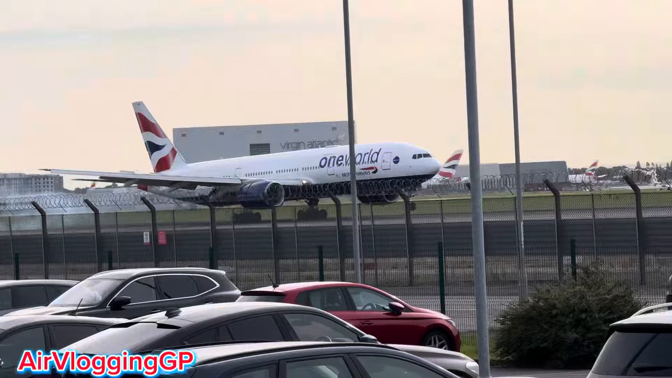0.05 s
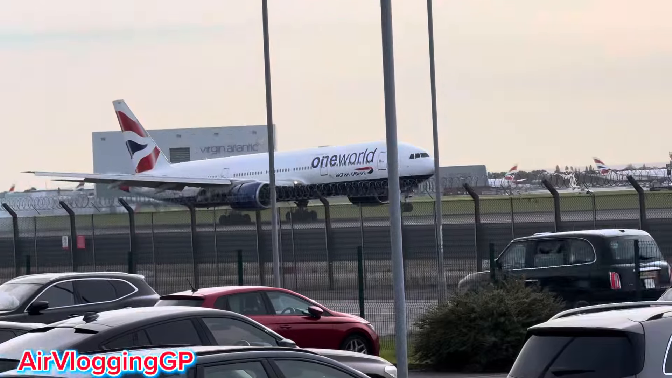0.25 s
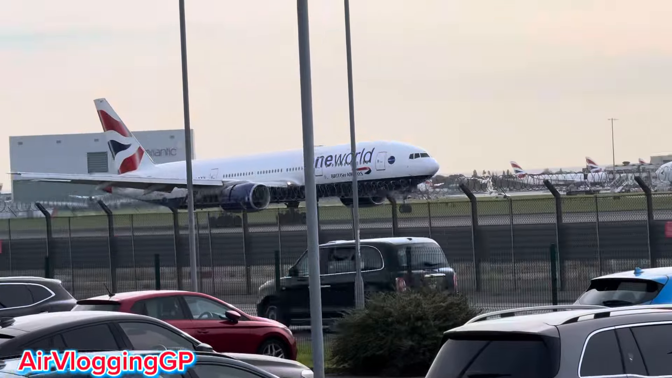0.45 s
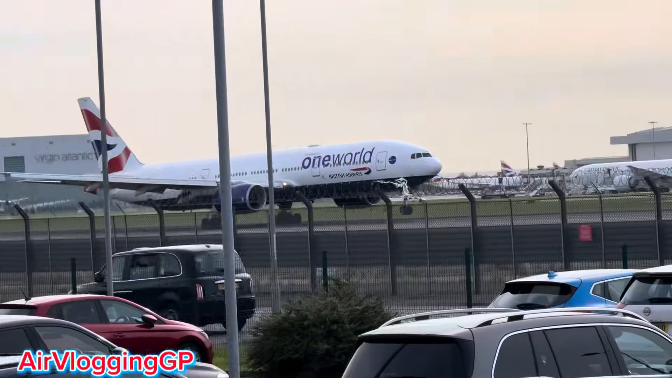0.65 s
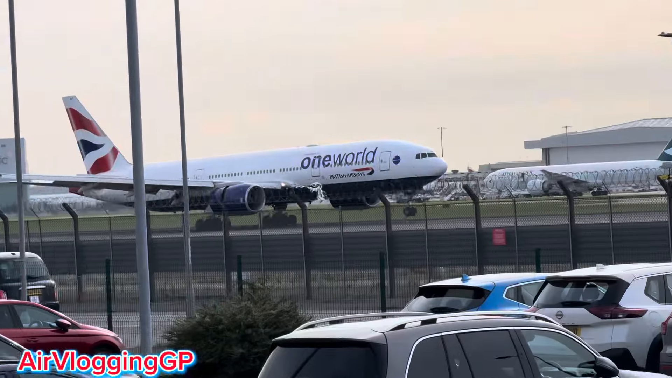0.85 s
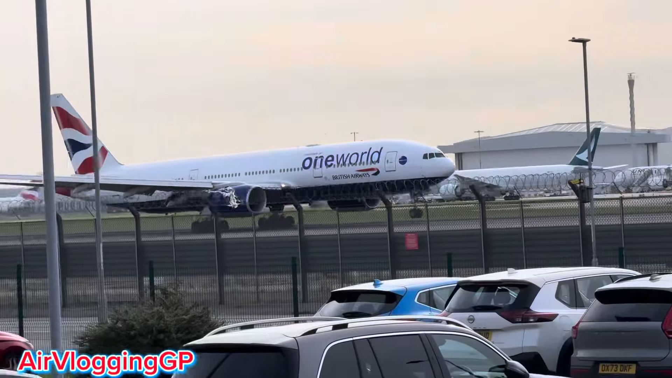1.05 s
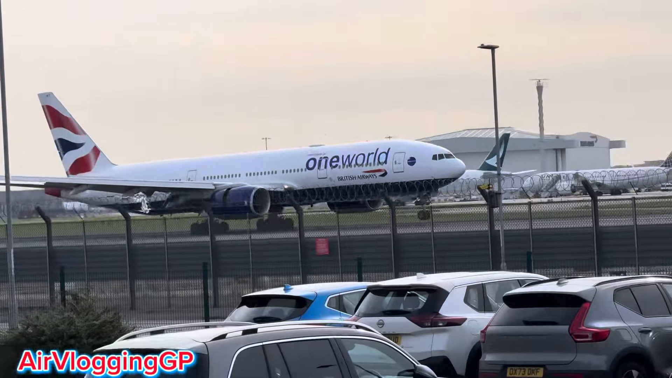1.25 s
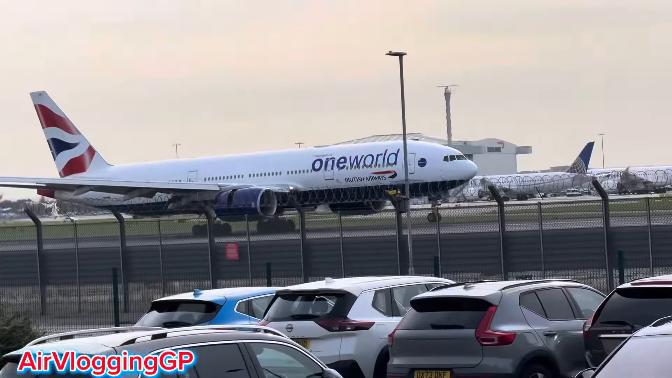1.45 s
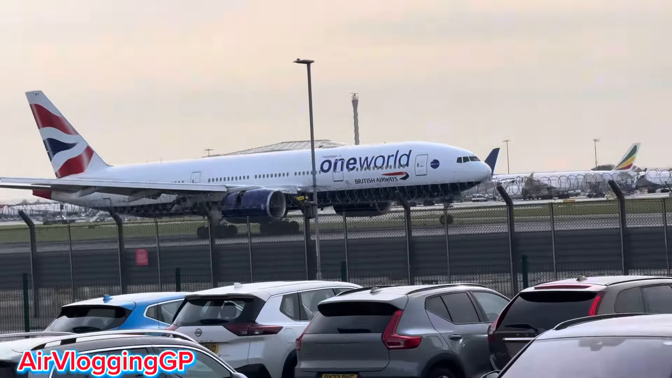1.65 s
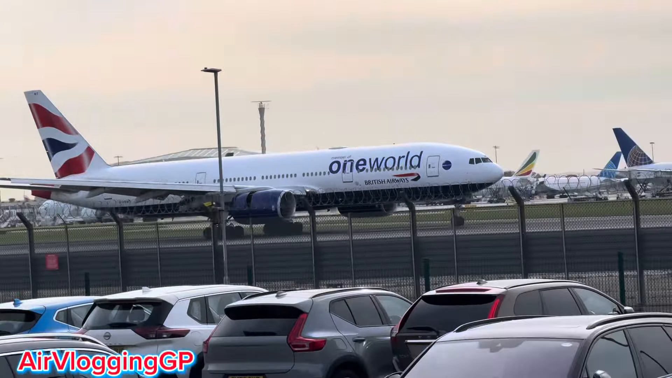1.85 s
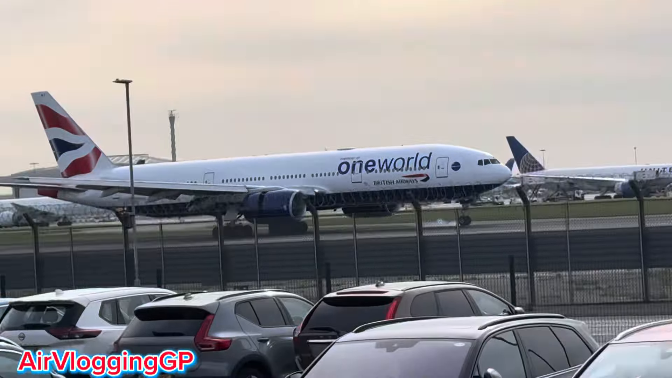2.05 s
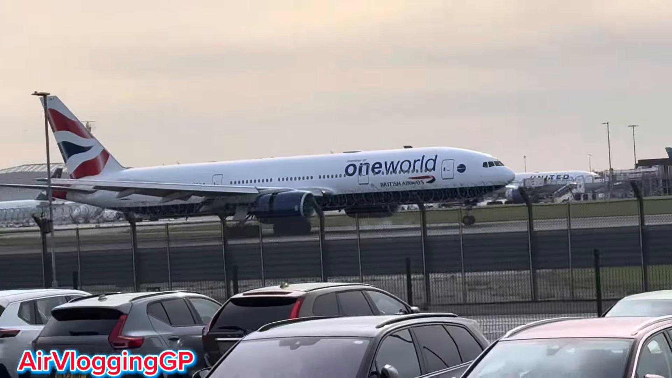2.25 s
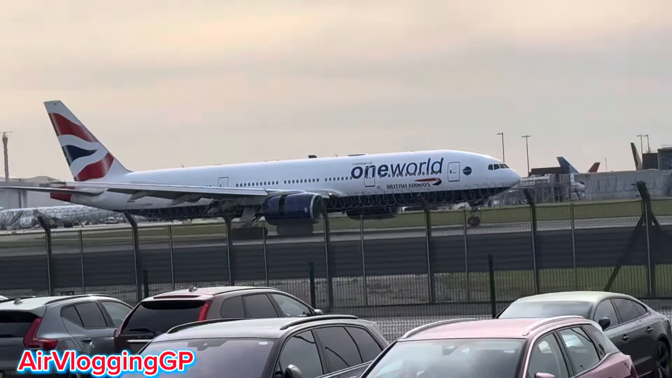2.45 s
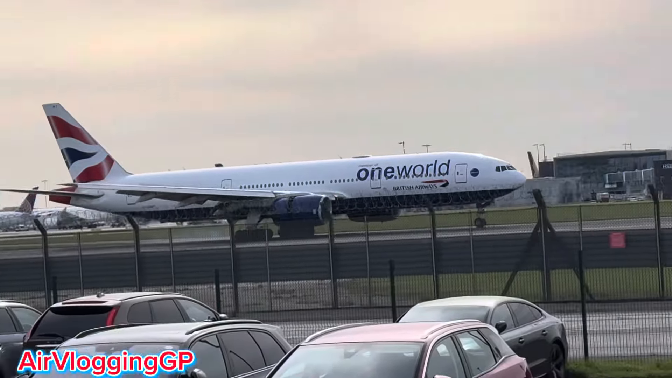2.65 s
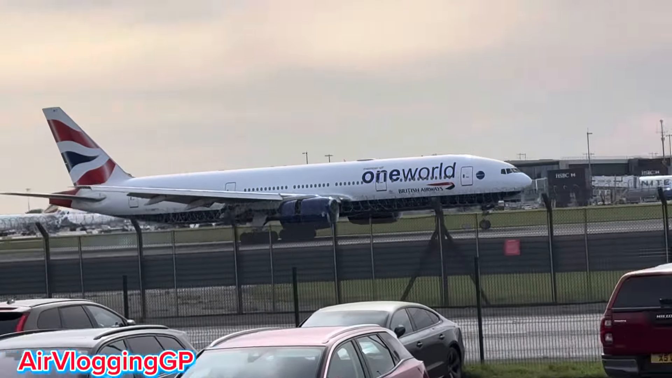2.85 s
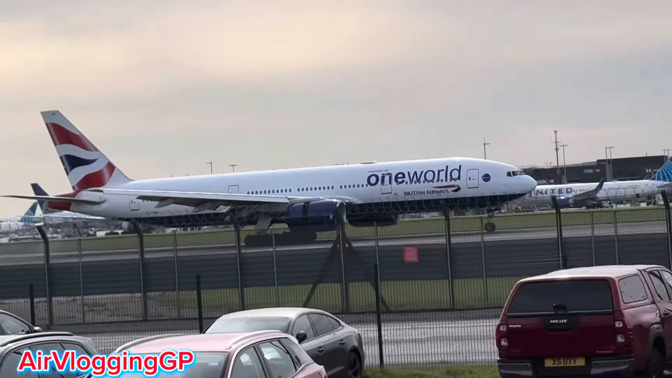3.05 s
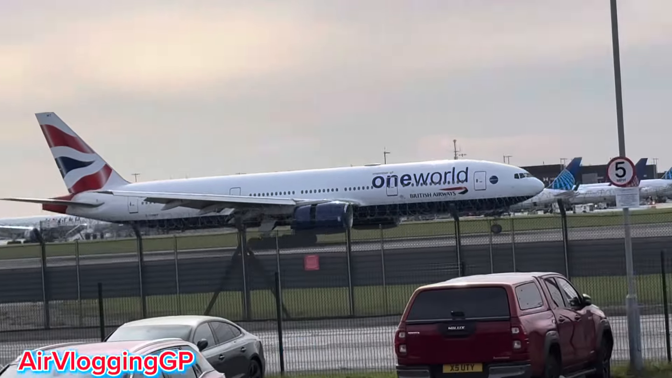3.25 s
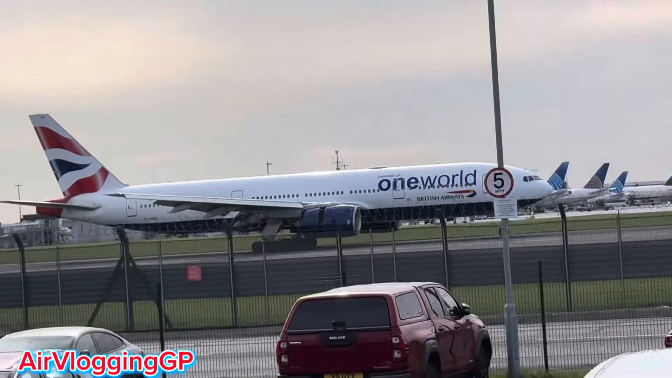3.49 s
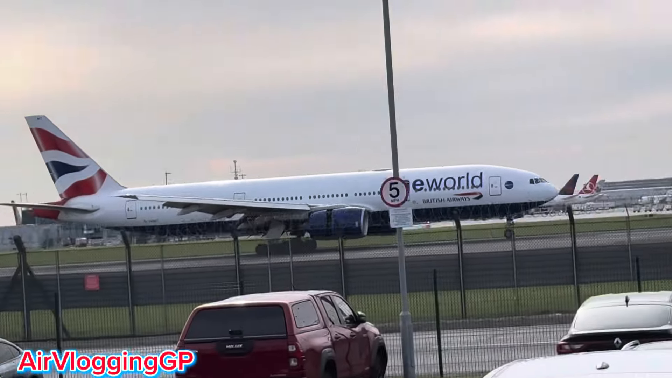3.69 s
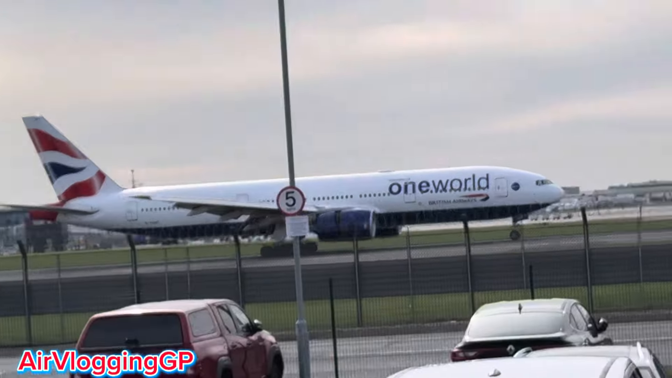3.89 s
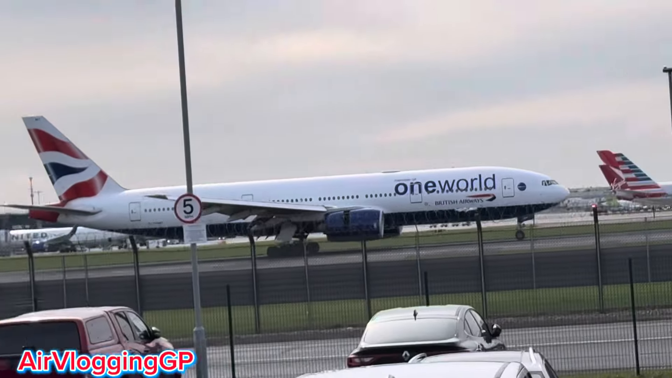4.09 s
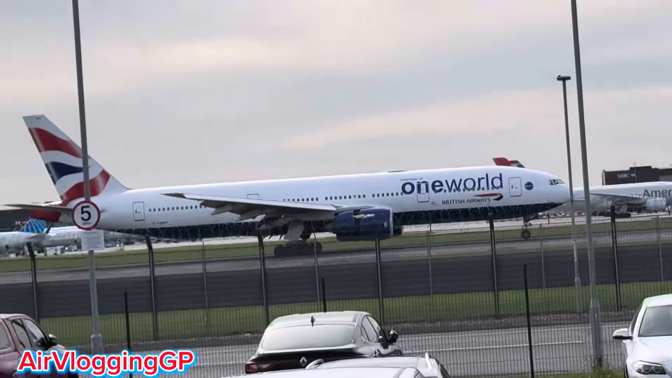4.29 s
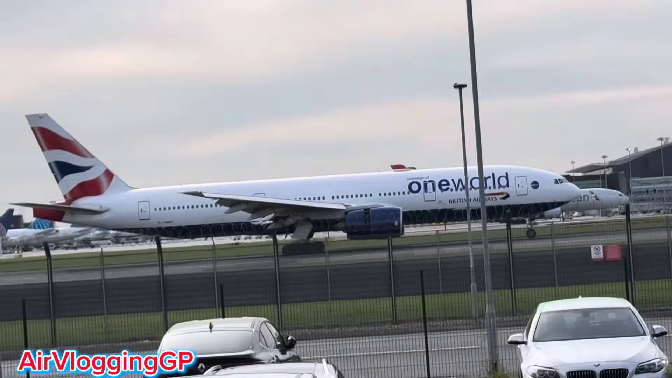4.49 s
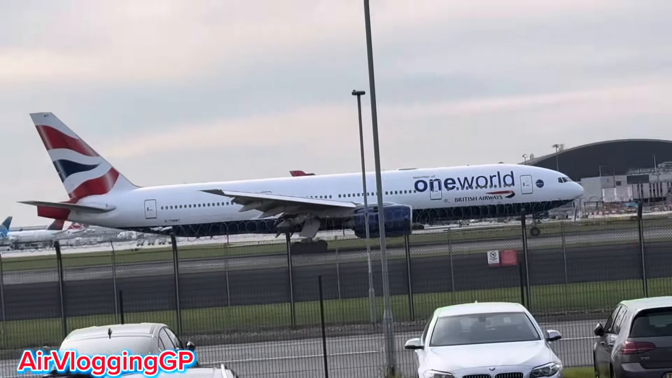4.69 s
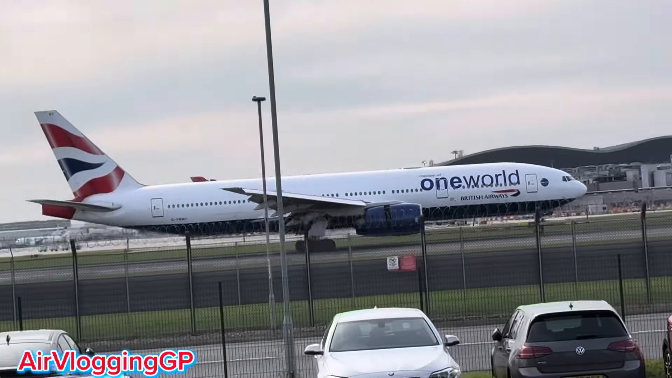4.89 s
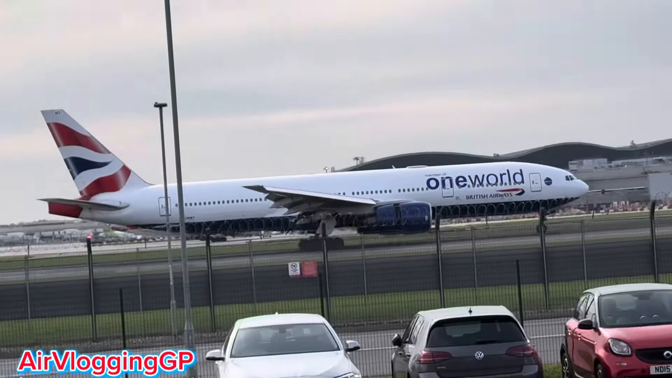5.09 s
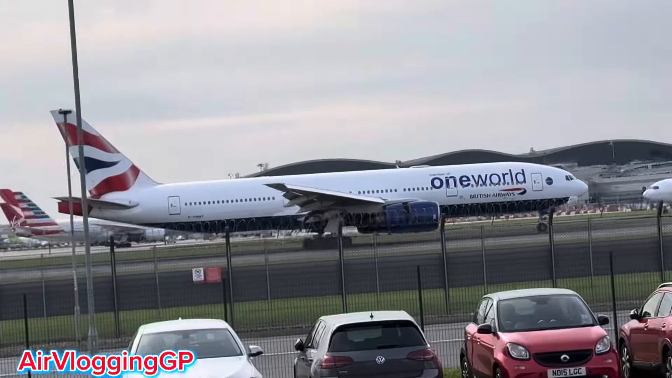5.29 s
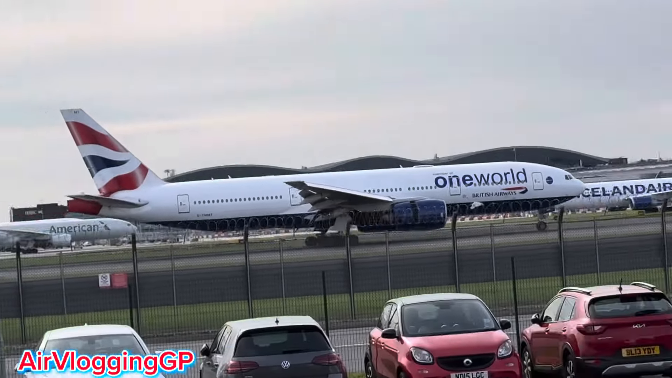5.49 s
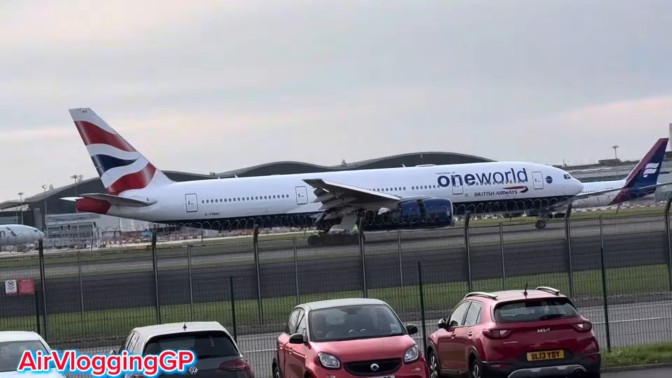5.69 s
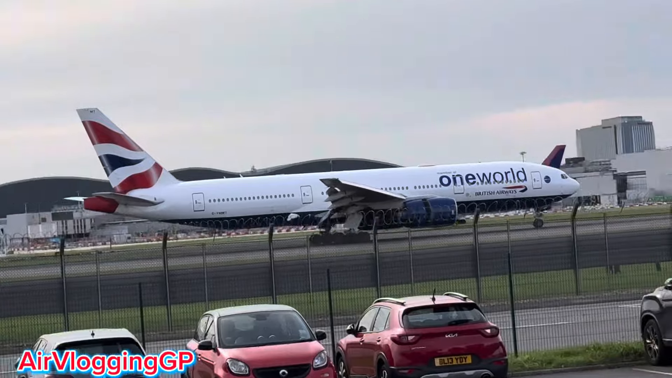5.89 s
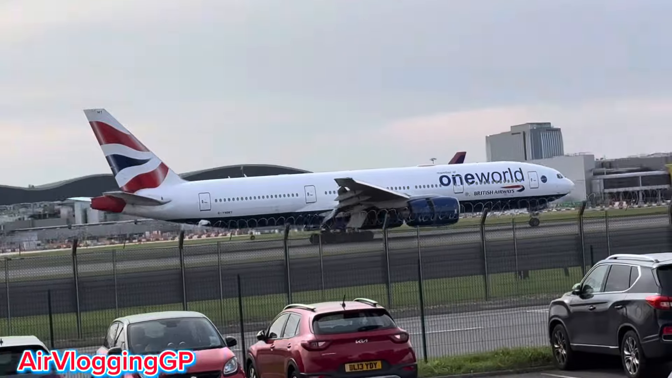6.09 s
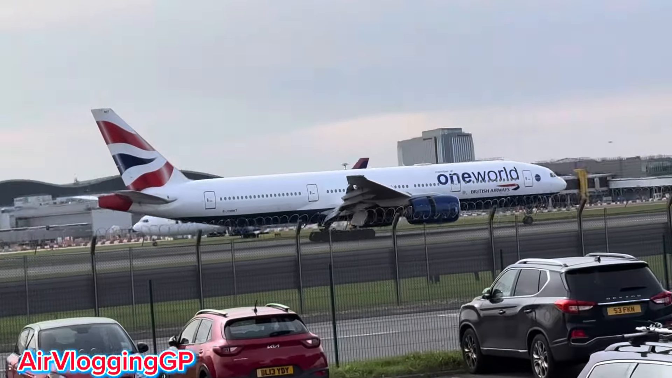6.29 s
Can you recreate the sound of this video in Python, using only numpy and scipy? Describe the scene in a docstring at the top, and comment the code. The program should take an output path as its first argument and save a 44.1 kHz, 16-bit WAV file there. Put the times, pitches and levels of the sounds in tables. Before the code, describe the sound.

Heard from a car park beyond the fence, a big airliner rolls out after landing. Deep bass rumble dominates at first, with a faint wavering howl sinking slightly in pitch and a thin whine. Around two seconds brief gliding tones poke out as fan rush rises. The reverse-thrust roar peaks past the middle, then eases but stays bright and patchy. Handheld phone, stereo, light wind buffeting.

```python
"""A large jet airliner rolls out along a runway, heard on a phone from a car park beyond the fence.
Coloured noises on drawn levels make exhaust rumble, reverse-thrust roar and fan rush; the air dulls the
treble and turbulence makes it patchy. Wavering tones make a sinking howl and a fan whine, and short
gliding bands stand out of the rush. A faint treble rustle is near, and a breeze buffets the two ports."""
import sys
import numpy as np
from scipy import signal
from scipy.fft import rfft, irfft
from scipy.io import wavfile
from scipy.ndimage import uniform_filter1d

SR = 44100
rng = np.random.default_rng(int(sys.argv[2]) if len(sys.argv) > 2 else 0)


def invert_db(level):
    """Linear amplitude ratio for a level in decibels (20 dB per decade), elementwise."""
    return 10 ** (np.asarray(level, dtype=float) / 20)


def output_pcm(signal):
    """Save a mono or channel-first signal as 16-bit PCM at the path in sys.argv[1].

    Samples are clipped to [-1, 1] before scaling.
    """
    pcm = np.clip(np.atleast_2d(signal).T, -1, 1) * 32767
    wavfile.write(sys.argv[1], SR, np.round(pcm).astype(np.int16))


N = 279583
T = np.arange(N) / SR  # seconds
F = np.maximum(np.fft.rfftfreq(N, 1 / SR), 1)  # Hz

# Swells of the exhaust rumble: start_s, level_db
RUMBLE_LEVEL = [(0, -26), (.3, -27.5), (.65, -23.5), (1, -25), (1.55, -19), (1.74, -25), (2.1, -15),
                (2.5, -18), (2.9, -13.5), (3.2, -17), (3.42, -9.5), (3.67, -16), (3.9, -12), (4.6, -13.5),
                (5.1, -15), (5.7, -16.5), (6.34, -17)]
# Swells of the growl above the rumble: start_s, level_db
GROWL_LEVEL = [(0, -45.5), (.6, -40), (1.1, -37), (1.6, -34.5), (2.1, -31), (2.6, -25.5), (3.0, -24),
               (3.5, -21.5), (3.9, -23.5), (4.3, -26), (4.7, -25.5), (5.1, -33.5), (5.6, -25), (6.0, -27.5),
               (6.34, -29.5)]
# Swells of the reversed flow: start_s, level_db
ROAR_LEVEL = [(0, -38), (.75, -38), (1.25, -38.5), (1.8, -34.5), (1.97, -31.5), (2.15, -32.5), (2.6, -32),
              (3.3, -26), (3.45, -25), (3.6, -21.5), (3.8, -21.5), (4.0, -24), (4.3, -25), (4.6, -28.5),
              (5.15, -28.5), (5.5, -32.5), (5.75, -28.5), (6.34, -31)]
# Swells of the fan rush: start_s, level_db
FAN_LEVEL = [(0, -42), (.95, -41), (1.5, -40.5), (1.69, -38), (1.75, -34.5), (1.86, -34.5), (2.05, -33),
             (2.33, -37), (2.75, -33), (2.95, -35), (3.1, -31.5), (3.26, -28), (3.36, -26), (3.5, -28),
             (3.75, -28), (3.9, -27), (4.15, -30), (4.35, -28.5), (4.7, -29.5), (5.1, -29.5), (5.25, -31),
             (5.45, -33), (5.64, -32), (5.76, -28), (5.88, -30.5), (6.05, -30.5), (6.34, -33)]
# Airframe howl: start_s, pitch_hz, level_db
HOWL = [(0, 570, -46), (.25, 566, -46), (.42, 562, -42), (.48, 565, -52), (.54, 568, -38),
        (.61, 564, -34.5), (.68, 554, -43), (.9, 540, -41), (1.06, 530, -40), (1.17, 520, -38.5),
        (1.22, 524, -43), (1.27, 532, -36.5), (1.33, 522, -48), (1.38, 526, -41), (1.45, 535, -47),
        (1.54, 542, -38.5), (1.7, 526, -42), (1.84, 520, -42), (1.9, 514, -36), (1.95, 511, -29.5),
        (2.02, 518, -39), (2.1, 525, -46), (2.16, 538, -34), (2.23, 530, -47), (2.29, 540, -34.5),
        (2.35, 530, -50), (2.8, 520, -54)]
# Fainter tone above the howl: start_s, pitch_hz, level_db
OVERTONE = [(1.8, 850, -62), (1.92, 852, -43), (2.05, 838, -46), (2.17, 846, -43), (2.3, 830, -44.5),
            (2.4, 812, -44), (2.5, 800, -62), (2.7, 800, -90)]
# Fan blade whine: start_s, pitch_hz, level_db
WHINE = [(0, 3300, -68), (.6, 3260, -61), (.72, 3255, -56), (.78, 3250, -60), (.84, 3250, -52),
         (.92, 3250, -59), (1.18, 3250, -54), (1.25, 3245, -56), (1.32, 3235, -46), (1.4, 3170, -57),
         (1.55, 3110, -50), (1.65, 3120, -55), (1.8, 3180, -57), (2.0, 3210, -48), (2.1, 3170, -54),
         (2.18, 3130, -45), (2.24, 3110, -58), (2.5, 3050, -70)]
# Brief narrow gliding bands, one early and a cluster near two seconds:
# middle_s, half_length_s, pitch_hz, glide_hz_per_s, width_hz, level_db
STREAKS = [(.82, .045, 815, 300, 300, -38), (1.82, .04, 1750, 2500, 200, -42),
           (1.88, .05, 2180, 4000, 260, -41), (1.89, .03, 1800, 600, 120, -43),
           (1.94, .035, 1420, 2200, 150, -41), (2.0, .025, 1640, 3500, 150, -37.5),
           (2.025, .025, 1860, 600, 100, -37), (2.09, .04, 1860, 1200, 160, -43),
           (2.11, .05, 2420, 2500, 260, -43), (1.96, .04, 775, 500, 90, -39),
           (2.08, .04, 745, 200, 70, -40), (1.9, .08, 472, -120, 40, -37)]
# The path as the jet goes by: start_s, treble_gain_db (at 7 kHz), duct_over_rush_db, roar_upper_over_lower_db
PATH = [(0, -13.5, -9, -3), (1, -18, -9, 1), (1.7, -10, -8, 3.5), (2.5, -5.5, -7, -1), (3.4, -6, -8, -3.5),
        (3.62, -6.5, -6, 4.5), (3.85, -6.5, -9.5, -6.5), (4.2, -4.5, -9.5, -3.5), (4.45, -4.5, -7.5, -5.5),
        (4.9, -3.5, -6.5, -1), (5.15, -6, -8.5, 1), (5.5, -3.5, -6, 7.5), (5.8, -3, -8, 4.5),
        (6.34, -5.5, -14, 5)]
# Moments when the treble brightens: middle_s, half_length_s, gain_db (at 7 kHz)
FLARES = [(3.32, 0.044, 1.5), (3.796, 0.015, 4.5), (3.982, 0.0095, 4), (4.106, 0.022, 6), (4.323, 0.038, 1),
          (5.107, 0.01, 4), (5.333, 0.016, 3), (5.75, 0.077, 0.5)]
# Band around 3.5 kHz against the rest of roar and fans: start_s, gain_db
PRESENCE = [(0, -3.5), (.9, 0), (1.3, 2), (1.65, 3), (1.76, 1), (2.3, 2.5), (2.6, 1), (3.0, 2), (3.45, 2),
            (3.9, -1.5), (4.5, -1), (5.1, -1), (5.6, -0.5), (6.34, -2.5)]
PRESENCE_HZ, PRESENCE_OCTAVES = 3520, .45
# Faint near rustle: middle_s, half_length_s, level_db
RUSTLE = [(.25, 0.13, -82), (0.498, 0.11, -73.5), (.64, 0.063, -79), (0.74, 0.056, -74), (2.38, .0015, -67),
          (2.401, .0018, -57)]
# Gusts on the ports: start_s, end_s, level_db
GUSTS = [(1.162, 1.74, -37), (4.53, 4.66, -31), (5.048, 5.3, -42.5), (5.7, 6.0, -45.5)]
GUST_EDGE_S, CALM_DB = .03, -56

# Noise colours, only their shape counts: pitch_hz, density_db (per Hz)
RUMBLE_COLOUR = [(15, -53.5), (25, -22.5), (40, -6), (52, 3), (72, 2.5), (100, -2), (130, -8.5), (180, -21),
                 (300, -87.5), (600, -120)]
GROWL_COLOUR = [(30, -70), (60, -38), (100, -6), (150, 7), (190, 3), (250, -8.5), (330, -19), (500, -66),
                (1200, -120)]
ROAR_COLOUR = [(50, -82.5), (120, -38), (220, -2), (300, -2.5), (450, -5.5), (700, -6), (900, -9.5),
               (1200, -20.5), (2000, -48), (5000, -120)]
RUSH_COLOUR = [(150, -84.5), (400, -37), (800, -10.5), (1100, -0.5), (1500, -2.5), (2000, -4.5), (2600, -7),
               (3400, -8.5), (4400, -15), (4850, -19.5), (5400, -17.5), (5800, -19.5), (7000, -26),
               (7800, -29), (8700, -40.5), (9300, -41), (11000, -53.5), (12500, -77.5)]
DUCT_COLOUR = [(700, -92), (1500, -42.5), (2100, -9), (2400, -5.5), (2700, -6.5), (2900, -10.5),
               (4000, -51), (8000, -110)]
BUFFET_COLOUR = [(25, -31.5), (60, 1), (110, -1.5), (200, -8.5), (350, -24.5), (1500, -90)]
HISS_COLOUR = [(1500, -77), (3000, -30), (6000, 6), (8000, 2.5), (9200, -6), (11500, -10), (12500, -37)]

# Angle of the jet to the phone: start_s, off_axis_share (scales left_lead_rad), scatter_gain_db
PORT_ANGLE = [(0, 1.1, -1.5), (1, 1.3, 1), (2.3, 1.3, 4), (2.9, 0.94, 3), (3.25, 0.4, 2.5),
              (4.9, 0.16, 0.5), (6.34, 0.88, 3)]
# Port pair: pitch_hz, left_over_right_db, left_lead_rad (at share 1), scatter_over_mid_db (at gain 0 dB)
PORT_PAIR = [(35, 0, 0, -44), (100, 0, .08, -27), (170, 0, .2, -16), (280, -.5, .35, -16),
             (450, -.3, .7, -10), (900, 1, .8, -10), (1250, 2, .8, -12), (1500, 4.5, .6, -10),
             (1750, 3.5, 0, -12), (2030, 2.5, 0, -15), (2130, 0, 0, -40), (7000, 0, 0, -42),
             (9000, 0, 0, -10)]
SELF_NOISE_DB = -104


def curves(table):
    """Columns of a time table, one value per sample."""
    s, *columns = np.transpose(table)
    return [np.interp(T, s, c) for c in columns]


def by_hz(table):
    """Columns of a frequency table, one value per bin."""
    hz, *columns = np.transpose(table)
    return [np.interp(np.log(F), np.log(hz), c) for c in columns]


def unit(x):
    """Scale to rms 1."""
    return x / np.sqrt(np.mean(x ** 2))


def noise(colour):
    """Gaussian noise of a given colour, rms 1."""
    white = rfft(rng.standard_normal(N))
    return unit(irfft(white * invert_db(by_hz(colour)[0]), N))


def field(shape, long, wide):
    """Smooth random relief, smoothed over long steps of time and wide steps of frequency, rms 1."""
    relief = rng.standard_normal(shape)
    for _ in range(2):
        relief = uniform_filter1d(relief, long, axis=1)
        relief = uniform_filter1d(relief, wide, axis=0)
    return unit(relief)


def bump(s, half):
    """A smooth swell around s, 1 at the top."""
    return np.exp(-((T - s) / half) ** 2)


def narrow(hz, gain, width_hz, steady):
    """A wavering tone: a gliding carrier, partly steady, partly with a random complex envelope."""
    sos = signal.butter(2, width_hz / 2, fs=SR, output="sos")
    wobble = signal.sosfilt(sos, rng.standard_normal(N) + 1j * rng.standard_normal(N))
    envelope = steady + wobble / np.std(wobble)
    carrier = np.exp(2j * np.pi * np.cumsum(hz) / SR)
    return gain * unit((envelope * carrier).real)


def breeze():
    """Wind buffets the ports with low, lumpy noise; a calm level sets in with the first gust."""
    def edge(s):
        return np.clip((T - s) / GUST_EDGE_S + .5, 0, 1)

    lumps = invert_db(2.5 * field((1, N), 900, 1)[0])
    calm = invert_db(CALM_DB) * edge(GUSTS[0][0])
    gusts = sum(invert_db(db) * (edge(start) - edge(end)) for start, end, db in GUSTS)
    return (calm + gusts) * lumps * noise(BUFFET_COLOUR)


def rustle():
    """A thin, grainy treble flutter close by: hiss with a random fast level."""
    grain = invert_db(3.1 * field((1, N), 300, 1)[0])
    swells = sum(invert_db(db) * bump(s, half) for s, half, db in RUSTLE)
    return swells * grain * noise(HISS_COLOUR)


def through_air(x, treble_db, patchy_db, flicker_db):
    """Absorption grows with frequency; eddies on the path make patches and quick treble flickers."""
    hz, s, z = signal.stft(x, SR, nperseg=512)
    hz = hz[:, None]
    rise = np.minimum(hz / 7000, 1.3) ** 1.57  # 1 at 7 kHz
    octaves = np.log2(np.maximum(hz, 1) / PRESENCE_HZ)
    band = np.exp(-(octaves / PRESENCE_OCTAVES) ** 2)
    gain_db = np.interp(s, T, treble_db) * rise + np.interp(s, T, curves(PRESENCE)[0]) * band
    patches = patchy_db * field(z.shape, 15, 5)
    flickers = flicker_db * np.minimum(rise, 1) * field(z.shape, 4, 58)
    return signal.istft(z * invert_db(gain_db + patches + flickers), SR, nperseg=512)[1][:N]


def streaks():
    """Short gliding bands of wavering tone that stand out of the rush."""
    total = 0
    for s, half, hz, glide, width, db in STREAKS:
        pitch_hz = np.clip(hz + glide * (T - s), 100, 4000)
        total = total + narrow(pitch_hz, invert_db(db) * bump(s, half), width, steady=0.55)
    return total


def howl():
    """The airframe's wavering tone, with a fainter and narrower tone above it."""
    howl_hz, howl_db = curves(HOWL)
    over_hz, over_db = curves(OVERTONE)
    low = narrow(howl_hz, invert_db(howl_db), width_hz=70, steady=1.4)
    return low + narrow(over_hz, invert_db(over_db), width_hz=34, steady=1.1)


def fans():
    """The fans rush as broad noise, ring in their duct and whine at a gliding blade pitch."""
    duct_db = curves(PATH)[1]
    whine_hz, whine_db = curves(WHINE)
    rush = invert_db(curves(FAN_LEVEL)[0]) * (noise(RUSH_COLOUR) + invert_db(duct_db) * noise(DUCT_COLOUR))
    return rush + narrow(whine_hz, invert_db(whine_db), width_hz=130, steady=.55)


def roar():
    """The reversed stream: its upper half rises and falls against the lower."""
    level_db, bright_db = curves(ROAR_LEVEL)[0], curves(PATH)[2]
    x = noise(ROAR_COLOUR)
    lower = signal.sosfiltfilt(signal.butter(2, 560, fs=SR, output="sos"), x)
    upper = x - lower
    return invert_db(level_db) * (invert_db(-bright_db / 2) * lower + invert_db(bright_db / 2) * upper)


def lumpy(x, lumps_db):
    """Large eddies surge unevenly: now one part of the bass swells, now another."""
    z = signal.stft(x, SR, nperseg=4096)[2]
    return signal.istft(z * invert_db(lumps_db * field(z.shape, 5, 3)), SR, nperseg=4096)[1][:N]


def exhaust():
    """Big eddies behind the engines: low rumble and the growl above it."""
    rumble = invert_db(curves(RUMBLE_LEVEL)[0]) * noise(RUMBLE_COLOUR)
    growl = invert_db(curves(GROWL_LEVEL)[0]) * noise(GROWL_COLOUR)
    return lumpy(rumble + growl, lumps_db=1.5)


def jet():
    """The whole airliner; only roar and fans pass the air's treble loss and patches."""
    treble_db = curves(PATH)[0] + sum(db * bump(s, half) for s, half, db in FLARES)
    highs = through_air(roar() + fans(), treble_db, patchy_db=0.77, flicker_db=1.5)
    return exhaust() + highs + howl() + streaks()


def scene():
    """Ports differ in level and phase below about 2 kHz; scatter and wind drive them oppositely."""
    off_axis, scatter_db = curves(PORT_ANGLE)
    tilt_db, lead_rad, spread_db = by_hz(PORT_PAIR)
    direct = rfft(jet() + rustle())
    scattered = rfft(jet())  # the same levels from fresh noise
    mid = irfft(direct, N)
    side = irfft(direct * np.tanh(np.log(invert_db(tilt_db)) / 2), N)
    side += off_axis * irfft(direct * 1j * np.tan(lead_rad / 2), N)
    side += invert_db(scatter_db) * irfft(scattered * invert_db(spread_db), N)
    side += breeze()
    return np.array([mid + side, mid - side])


def top_cut(x):
    """Nothing passes above the cut-off."""
    return signal.sosfilt(signal.butter(12, 15000, fs=SR, output="sos"), x)


def record(dry):
    """A quick gain control evens out the bass swells; faint electronic hiss joins in."""
    bass = signal.sosfiltfilt(signal.butter(2, 130, fs=SR, output="sos"), dry)
    power = bass.mean(axis=0) ** 2
    quick = uniform_filter1d(power, int(0.089 * SR))
    slow = uniform_filter1d(power, int(.4 * SR))
    gain = np.clip((quick + 1e-12) / (slow + 1e-12), .3, 9) ** -.12
    hiss = invert_db(SELF_NOISE_DB) * rng.standard_normal(dry.shape)
    mix = dry + bass * (gain - 1) + hiss
    return top_cut(mix)


dry = scene()
out = record(dry)
output_pcm(out)
```